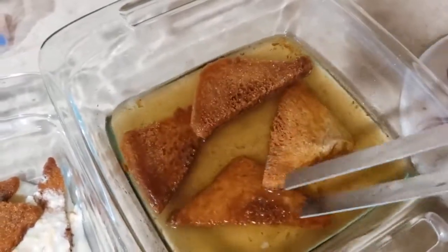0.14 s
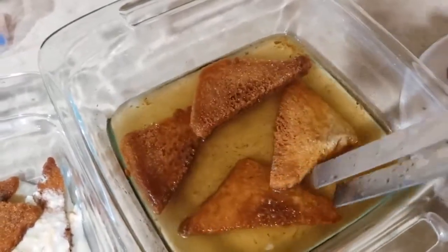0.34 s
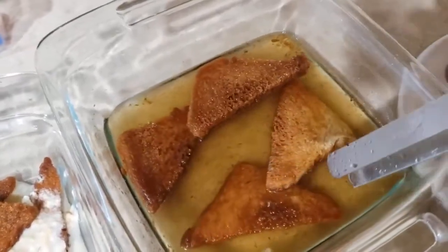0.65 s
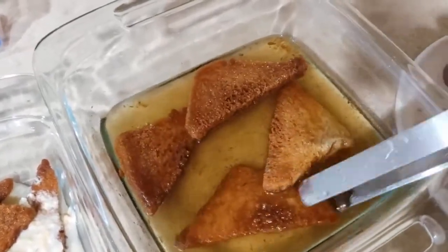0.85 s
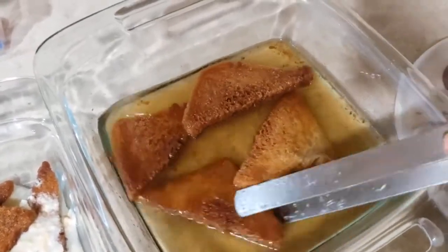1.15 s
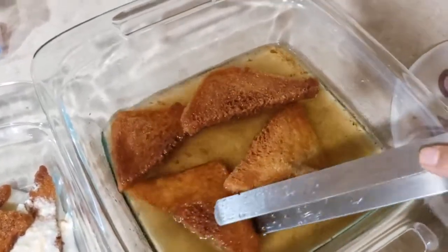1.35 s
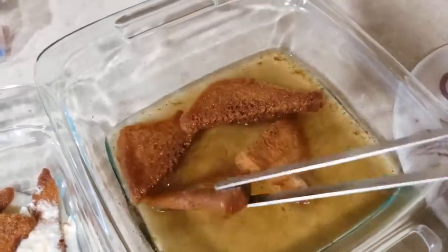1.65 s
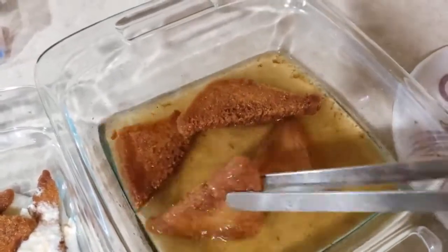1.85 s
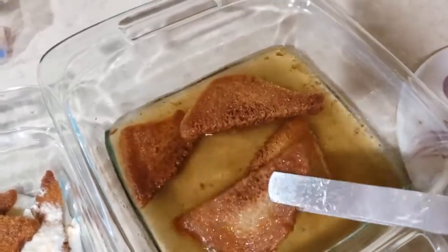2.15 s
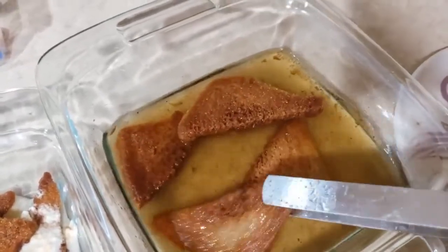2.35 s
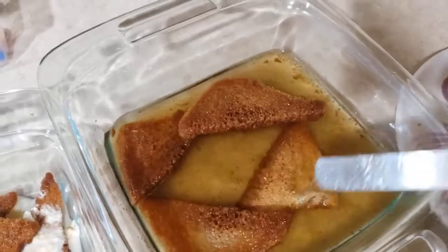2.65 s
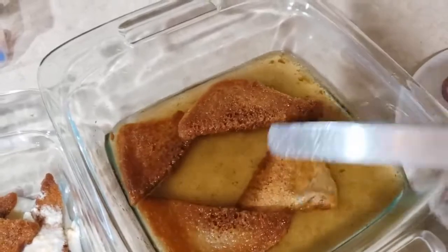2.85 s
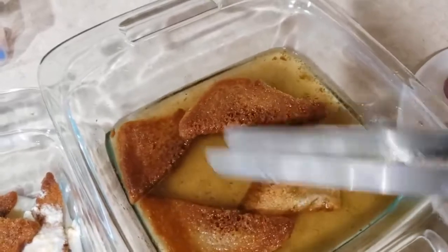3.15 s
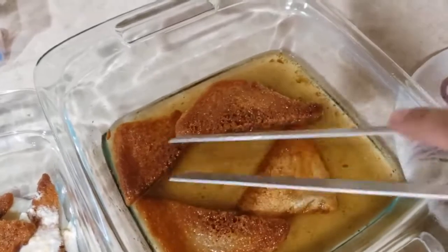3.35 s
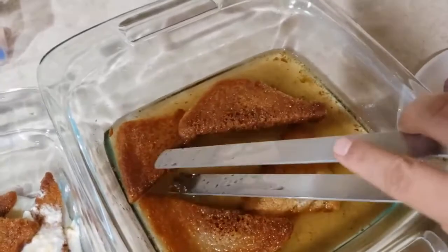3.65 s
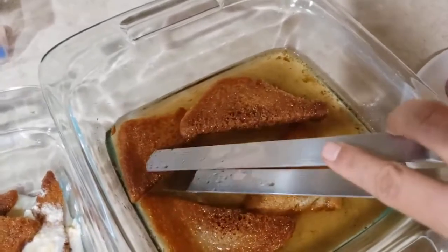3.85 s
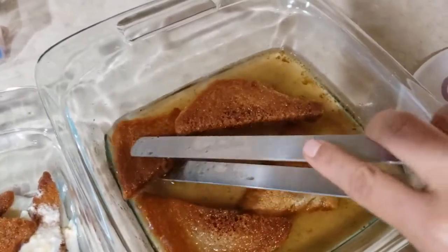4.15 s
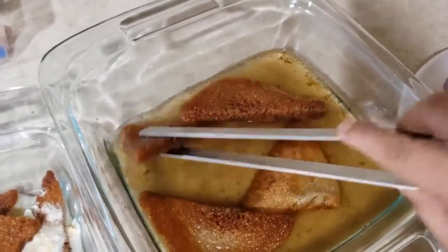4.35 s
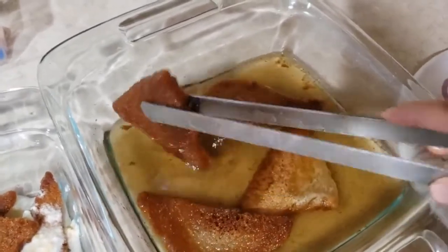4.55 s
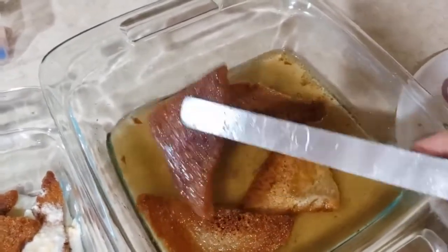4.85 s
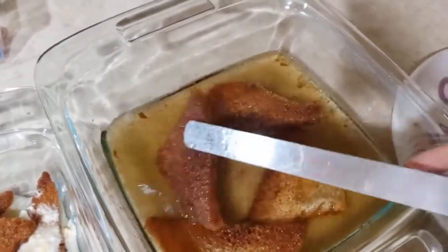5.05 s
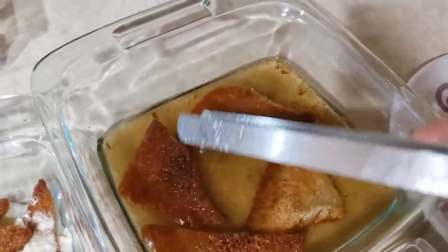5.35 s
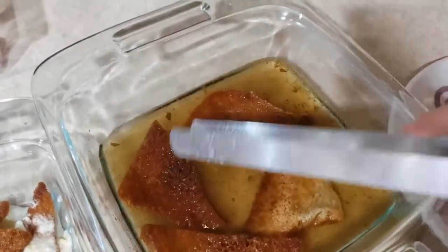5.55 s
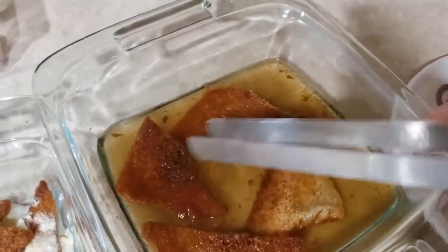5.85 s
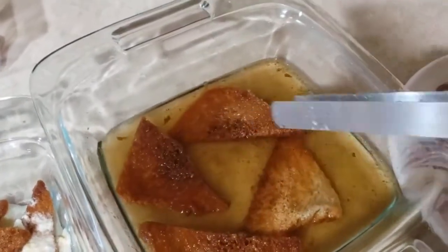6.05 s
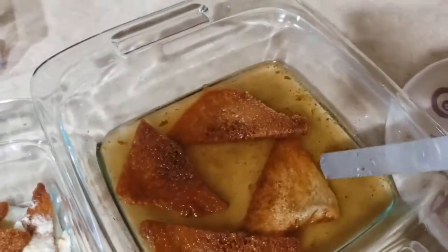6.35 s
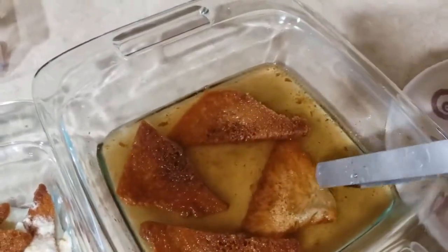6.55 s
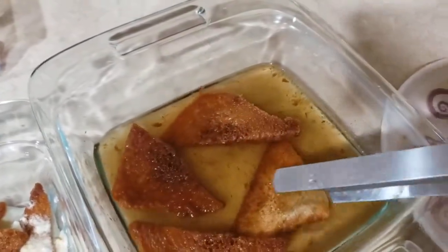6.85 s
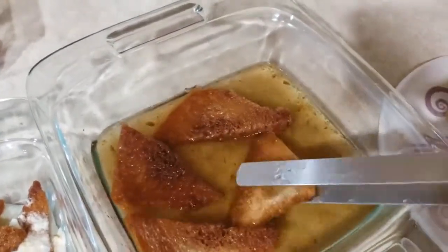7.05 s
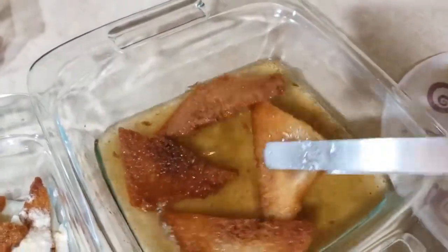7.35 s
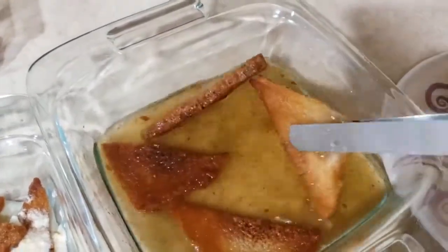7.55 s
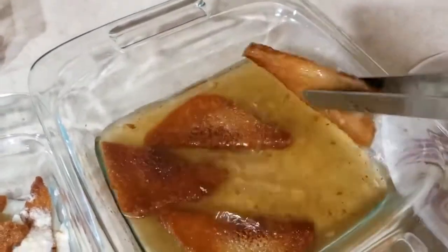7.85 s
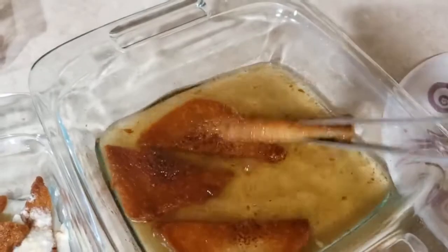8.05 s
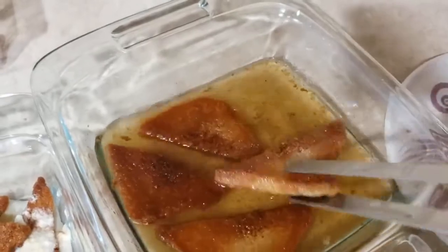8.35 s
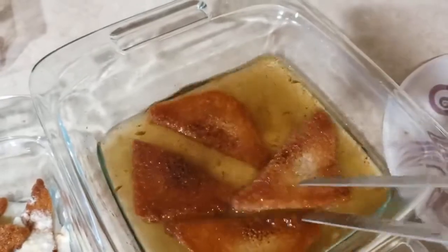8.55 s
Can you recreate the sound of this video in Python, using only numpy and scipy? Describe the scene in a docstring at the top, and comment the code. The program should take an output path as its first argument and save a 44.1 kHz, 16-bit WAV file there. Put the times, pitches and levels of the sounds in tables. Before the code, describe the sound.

Close up in a small, slightly reverberant kitchen, a low fan hums steadily. Metal tongs click together and strike a glass dish in scattered bright clinks, with quiet gaps between. In between, syrupy bread crackles faintly, peels with small wet smacks, and drops with soft gulping thuds. Muffled glass nudges follow, ending on a crisp clink.

```python
"""Tongs turning syrup-soaked bread

Steel tongs turn slices of fried bread in a glass dish of syrup, close by in a small kitchen.
Tong clinks and dish knocks are struck decaying modes plus a short noise clash.
Wet smacks, dull thuds, crackle and slosh: noise bursts and random ringing grains; syrup films snap.
A fan hums underneath (wavering sines over shaped noise), with faint hiss and a diffuse room tail."""
import sys
import numpy as np
from scipy import signal
from scipy.fft import rfft, irfft, next_fast_len
from scipy.io import wavfile
from scipy.ndimage import uniform_filter1d

SR = 44100
rng = np.random.default_rng(int(sys.argv[2]) if len(sys.argv) > 2 else 0)


def int16_out(signal):
    """Quantize to a 16-bit WAV file."""
    q = np.round(np.clip(np.atleast_2d(signal).T, -1, 1) * 32767)
    wavfile.write(sys.argv[1], SR, q.astype(np.int16))


N = 383209
CUTOFF_HZ = 15850
RING_SAMPLES = 24576
TIME = np.arange(N) / SR
AGE = np.arange(RING_SAMPLES) / SR

# glass dish modes: f/Hz, t60/s, left-right/dB, relative level/dB struck at place 0, 1, 2, 3
GLASS = [(1378, .21, -7, -8, 1.5, 3, -.5), (1520, .14, 0, -17, -9, -1, -1),
         (1892, .12, 0, -9, -13, -7, -10), (2255, .13, 0, -14, -9, -13, -7),
         (2397, .22, 0, -5, -3, -10, -11), (2652, .17, 1, -12, -3, -8, -20),
         (3064, .3, 0, -15, -10, -16, -1), (3612, .15, 5, 11, 3, -3, -10), (3985, .14, 0, -9, -11, -11, -9),
         (4170, .22, 0, -10, -12, -4, -4), (4201, .27, 4, -13, -13, -7, 3),
         (4474, .18, 0, -7, -20, -22, -22), (4780, .17, 0, -6, -7, -20, -25),
         (5100, .13, 2, -4, 1, -15, -13), (5286, .2, 2, -10, -7, -11, -9), (5675, .16, 2, -8, -8, -25, -5),
         (6170, .16, 3, -9, -6, -4, -5), (6990, .15, 0, -15, -5, -10, -20), (7300, .15, 3, 0, -8, 1, -6),
         (7625, .15, 3, -5, -5, 0, -6), (7800, .2, 2, -1, -1, -9, -12), (8300, .15, 0, -8, -10, -13, -4)]
# tong arm modes: f/Hz, t60/s, relative level/dB held loosely, held tightly
STEEL = [(6090, .25, -23, -11), (7020, .17, -15, -11), (7370, .17, -11, -20), (7560, .23, -14, -30),
         (8594, .11, -4, -13), (10280, .15, -11, -13), (11460, .11, -8, 3), (11594, .11, -4, -10),
         (12260, .12, -7, -11), (12662, .12, -2.5, -11), (13070, .13, -11, -13), (13150, .11, -6, -9),
         (14080, .11, -9, -6), (14647, .12, -5, -12), (14770, .1, -8, -6), (15430, .1, -11, -22)]
# wet smack spectrum: f/Hz, relative density/(dB per Hz)
SMACK = [(760, -10), (1300, -4.5), (2730, -13), (3130, -13), (5160, -10.5), (6170, -3.5), (6710, -4),
         (7140, -2), (8800, -8.5), (11400, -2.5), (15800, -2.5)]


def from_db(db):
    """Decibels to gain."""
    return 10 ** (np.asarray(db) / 20)


def rms_one(x):
    """Scale to unit power."""
    return x / np.sqrt(np.mean(x ** 2) + 1e-20)


def pan(db):
    """Left and right gains for a level difference."""
    return from_db(np.array([[db], [-db]]) / 2)


def at_hz(points, hz):
    """Interpolate a table on a log-frequency axis."""
    table_hz, table_db = np.transpose(points)
    return np.interp(np.log(hz + 1), np.log(table_hz), table_db)


def fade(t60_s):
    """Exponential decay after a blow."""
    return from_db(-60 * AGE / max(t60_s, .001))


def swell(rise_s):
    """Exponential build-up while a contact lasts."""
    return 1 - np.exp(-AGE / max(rise_s, 1e-5))


def add(out, s, sound):
    """Mix a sound in at time s."""
    start = max(round(s * SR), 0)
    out[:, start:start + sound.shape[1]] += sound[:, :N - start]


def drift(knots_per_s):
    """Slow random wander, linear between knots; rms 1."""
    knots = rng.standard_normal(2000)
    return rms_one(np.interp(TIME * knots_per_s, np.arange(len(knots)), knots))


def smooth_noise(size, width):
    """Moving average of white noise; rms 1."""
    return rms_one(uniform_filter1d(rng.standard_normal(size), size=width))


def noise(spectrum, size, tilt_db=0):
    """Stereo noise of a given colour, tilted per octave, most alike in both ears in the bass; rms 1."""
    # likeness of the ears: f/Hz, left-right correlation
    likeness = [(55, 1), (130, .7), (280, 0.94), (600, 0.29), (1500, 0.021), (6000, 0.035), (14000, 0.087)]
    padded = next_fast_len(size, True)
    hz = np.fft.rfftfreq(padded, 1 / SR)
    mid, side = rfft(rng.standard_normal((2, padded)))
    alike = np.clip(at_hz(likeness, hz), -1, 1)
    gain = from_db(at_hz(spectrum, hz) + tilt_db * np.log2(hz + 1)) * (hz < CUTOFF_HZ)
    gain = gain / (1 + (hz / (2 * spectrum[-1][0])) ** 4)  # roll-off beyond the table
    ears = np.sqrt(1 + alike) * mid + np.sqrt(1 - alike) * side * [[1], [-1]]
    return rms_one(irfft(gain * ears)[:, :size])


def mode_shapes(hz, t60_s):
    """Decaying sines, then decaying cosines, one row a mode."""
    turn = 2 * np.pi * np.outer(hz, AGE)
    decay = np.array([fade(t) for t in t60_s])
    return np.vstack([decay * np.sin(turn), decay * np.cos(turn)])


def ring(shapes, level_db, side_db, spread_rad):
    """Strike modes at random phase; each leads in one ear by spread_rad."""
    common, leader = rng.uniform(-1, 1, (2, len(level_db)))
    ears = np.array([[.5], [-.5]])
    phase = np.pi * common + spread_rad * np.sign(leader) * ears
    gain = from_db(level_db + side_db * ears)
    return np.hstack([gain * np.cos(phase), gain * np.sin(phase)]) @ shapes


def fan(waver_db, wander_hz):
    """Motor and blade tones waver over the rush of air; standing waves favour one ear or the other."""
    # motor and blade tones: f/Hz, level/dB, left-right/dB
    hum = [(120.7, -58, 6), (176.3, -62.5, 18.5), (240.3, -59, 8), (292.9, -47, -1.8), (476, -66, 6),
           (644.8, -65, 1)]
    # air moved by the fan: f/Hz, relative density/(dB per Hz)
    air = [(20, -46.5), (34, -22), (48, 2), (62, -5.5), (95, -16), (150, -10.5), (210, -11), (280, -9.5),
           (350, -12), (450, -15.5), (550, -20.5), (750, -22.5), (1050, -36), (2500, -49.5)]
    air_db = -51.5
    out = from_db(air_db) * noise(air, N) * pan(0.61)
    ear_phase = np.array([[.25], [-.25]])
    for hz, db, side_db in hum:
        phase = 2 * np.pi * np.cumsum(hz + wander_hz * drift(7)) / SR
        level = from_db(db + waver_db * drift(22))
        out += level * np.sin(phase + ear_phase) * pan(side_db)
    return out


def clash(tilt_db, chatter_db, ripple_db):
    """The tip chatters and sets off a thicket of short-lived modes, new at each blow."""
    # dense upper modes of steel and glass together: f/Hz, relative density/(dB per Hz)
    thicket = [(300, -4.5), (750, -5.5), (1250, 2), (1720, -9), (2000, -3), (2700, 3), (3350, -7.5),
               (3900, -0.5), (4600, -4.5), (5300, -1.5), (7500, 0.5), (9150, -10), (10000, -4.5),
               (15600, -9.5)]
    chatter = from_db(chatter_db * fade(.4) * smooth_noise(RING_SAMPLES, 40))
    spectrum = rfft(noise(thicket, RING_SAMPLES, tilt_db))
    peaks = from_db(ripple_db * smooth_noise(spectrum.shape[1], 70))
    decay = fade(0.081) + from_db(-18.5) * fade(0.17)
    return rms_one(irfft(spectrum * peaks)) * chatter * swell(.0014) * decay


def steel(shapes, grip, chance_db):
    """The squeeze of the hand picks which modes of the arms ring."""
    _, _, loose_db, tight_db = np.transpose(STEEL)
    level_db = loose_db + (tight_db - loose_db) * np.clip(grip, 0, 1)
    level_db = level_db + chance_db * rng.standard_normal(len(STEEL))
    return ring(shapes, level_db, side_db=-3.0, spread_rad=0.98) * swell(0.0015)


def glass(shapes, cut_hz, place, chance_db):
    """The place of the blow picks the modes; a contact cushioned by bread rings only the lowest."""
    hz, _, side_db = np.transpose(GLASS)[:3]
    level_db = np.array([np.interp(place, np.arange(4), mode[3:]) for mode in GLASS])
    cushion_db = -10 * np.log10(1 + (hz / cut_hz) ** 6)
    level_db = level_db + cushion_db + chance_db * rng.standard_normal(len(hz))
    # the tip stays against the glass: it damps the first ring and makes it buzz
    damping = from_db(-3) + from_db(-9) * fade(0.55)
    buzz = from_db(2 * fade(0.92) * smooth_noise(RING_SAMPLES, 150))
    return ring(shapes, level_db, side_db, spread_rad=1.7) * swell(0.0026) * damping * buzz


def tongs():
    """Every contact sounds the steel, the glass and the table under it, in shares set by its kind."""
    # table modes under the dish: f/Hz, relative level/dB, t60/s
    table_modes = [(63.8, -9, 0.81), (88.8, -1, 0.2), (137.6, -5.5, 0.18), (165.6, -4.5, 0.098),
                   (205, -2.5, 0.24), (378, -1, 0.024), (419, 0, 0.1), (462.4, -2, 0.24)]
    # arms click together: t/s, clash/dB, clash tilt/(dB per octave), steel ring/dB, grip 0 loose-1 tight
    clicks = [(.005, -38, 18.5, -46.5, 0.03), (0.7836, -33, 5, -25.5, .15), (1.384, -44, 14, -48.5, 0.8),
              (2.054, -42.5, 16, -41.5, 0.44), (2.1, -38, 20, -61, 0.63), (3.726, -25.5, 5, -35, 0.6),
              (4.093, -46.5, 9, -47, 1), (4.107, -36, 13, -44.5, 1), (4.201, -39.5, 13, -59, .6),
              (5.0437, -34.5, 11, -60.5, 0.1), (7.692, -40.5, 4, -62, .5)]
    # tips nudge the dish through bread and syrup: t/s, glass ring/dB, tick/dB, knock/dB
    touches = [(.332, -81, -62, -78.5), (0.98, -62, -55.5, -50), (1.121, -100, -55.5, -60),
               (2.353, -48.5, -58, -48.5), (2.434, -53.5, -55.5, -64), (2.504, -60.5, -63, -64.5),
               (3.008, -67, -61, -71), (6.909, -50, -65.5, -42.5), (7.095, -53, -45, -36),
               (7.921, -47.5, -53, -43.5), (8.016, -40, -49, -53.5)]
    # tongs hit bare glass, one arm after the other: t/s, clash/dB, clash tilt/(dB per octave),
    # steel ring/dB, grip 0-1, glass ring/dB, place 0-3 (clamped), second arm lag/s, left-right/dB
    strikes = [(0.7865, -23, 6, -27, 0.13, -34, 0.5, 0.0052, 0),
               (2.114, -28, -0.5, -45, 0.22, -37.5, 2.5, .03, 1),
               (6.414, -24.5, 7, -38.5, 0.36, -34, 1.5, .015, -0.5),
               (6.494, -32, 3, -61, .5, -56, 2, 0.0048, 2),
               (6.575, -35, 0, -70, .5, -51.5, -2.5, 0.0068, 3.5),
               (8.4512, -27, 4, -35, 0.61, -39, 3, .007, 2.5)]
    # what reaches table and dish through the bread, relative to the clash
    click_knock_db, click_glass_db = -17, -32
    touch_cut_hz, touch_place = 1250, 2.15  # cushioned contact
    tick_tilt_db_per_oct, tick_ring_db = 2, -15  # arm ring relative to the tick
    bare_cut_hz, strike_knock_db = 9800, -11.5  # hard contact; knock relative to the clash
    # the second arm lands softer and duller
    second_arm_db, second_arm_tilt_db_per_oct = -5, -3

    out = np.zeros((2, N))
    table_hz, table_db, table_t60_s = np.transpose(table_modes)
    dish = mode_shapes(*np.transpose(GLASS)[:2])
    arms = mode_shapes(*np.transpose(STEEL)[:2])
    table = mode_shapes(table_hz, table_t60_s)

    def metal(clash_db, tilt_db, steel_db, grip):
        """Clash of the tip and ring of the arms."""
        tip = from_db(clash_db) * clash(tilt_db, chatter_db=-1.5, ripple_db=4.0)
        return tip + from_db(steel_db) * steel(arms, grip, chance_db=4.5)

    def body(glass_db, cut_hz, place, knock_db):
        """Ring of the dish and its knock on the table."""
        knock = swell(0.0044) * ring(table, table_db, side_db=-0.5, spread_rad=0.47)
        return from_db(glass_db) * glass(dish, cut_hz, place, chance_db=-4.5) + from_db(knock_db) * knock

    for s, clash_db, tilt_db, steel_db, grip in clicks:
        carried = body(clash_db + click_glass_db, cut_hz=4300, place=1.9,
                       knock_db=clash_db + click_knock_db)
        add(out, s, metal(clash_db, tilt_db, steel_db, grip) * pan(-0.16) + carried)
    for s, glass_db, tick_db, knock_db in touches:
        tick = metal(tick_db, tick_tilt_db_per_oct, tick_db + tick_ring_db, grip=0)
        add(out, s, tick * pan(2.8) + body(glass_db, touch_cut_hz, touch_place, knock_db))
    for s, clash_db, tilt_db, steel_db, grip, glass_db, place, lag_s, side_db in strikes:
        both_arms = [(0, 0, 0), (lag_s, second_arm_db, second_arm_tilt_db_per_oct)]
        for delay_s, arm_db, arm_tilt_db in both_arms:
            blow = metal(clash_db, tilt_db + arm_tilt_db, steel_db, grip) * pan(side_db)
            struck = body(glass_db, bare_cut_hz, place, clash_db + strike_knock_db)
            add(out, s + delay_s, from_db(arm_db) * (blow + struck))
    return out


def pops():
    """A film of syrup snaps: a noise burst dying within milliseconds."""
    # film snaps: t/s, level/dB
    snaps = [(.4995, -48), (1.8712, -22), (2.8813, -53), (7.0364, -47), (7.444, -45)]
    out = np.zeros((2, N))
    for s, db in snaps:
        add(out, s, from_db(db) * noise(SMACK, RING_SAMPLES) * fade(0.0032))
    return out


def grains(low_hz, high_hz, per_s, cycles, spread_db, count):
    """Bubbles and films burst at random, each ringing at one of `count` pitches, t60 = cycles / f; rms 1."""
    out = np.zeros((2, N))
    for hz in np.geomspace(low_hz, high_hz, count):
        born = np.flatnonzero(rng.random(N) < per_s / count / SR)
        chance = rng.random((len(born), 3))
        sizes = from_db(spread_db * np.minimum(-np.log(1 - chance[:, 0]), 3.5))
        impulses = np.zeros((2, N))
        impulses[:, born] = sizes * (2 * chance[:, 1:].T - 1)
        impulses = impulses + 1e-12 * (TIME % .01)  # inaudible floor
        radius = from_db(-60 * hz / (cycles * SR))
        angle = 2 * np.pi * hz / SR
        resonator = [1, -2 * radius * np.cos(angle), radius * radius]
        out += np.sqrt(hz) * rms_one(signal.lfilter([1, 0, -1], resonator, impulses))
    return rms_one(out)


def coloured(x, spectrum):
    """Filter a steady texture by a spectrum; rms 1."""
    size = next_fast_len(N, True)
    gain = from_db(at_hz(spectrum, np.fft.rfftfreq(size, 1 / SR)))
    return rms_one(irfft(rfft(x, size) * gain, size)[:, :N])


def against_dish(x, t60_s):
    """Scraping under syrup wakes the modes of the glass, heavily damped; rms 1."""
    hz = np.transpose(GLASS)[0]
    shapes = mode_shapes(hz, np.full(len(hz), t60_s))
    response = ring(shapes, np.zeros(len(hz)), side_db=3, spread_rad=1.4)
    return rms_one(signal.fftconvolve(x, response, axes=1)[:, :N])


def push(start_s, length_s):
    """Speed of a slice: it picks up, holds, stops, and leaves the syrup to settle."""
    attack_s, release_s = 0.0041, 0.0076  # time constants of taking hold and letting go
    settle_db, settle_s = -27, 0.28  # syrup runs back: relative level, time constant
    attack = 1 - np.exp(-np.maximum(TIME - start_s, 0) / attack_s)
    after = np.maximum(TIME - start_s - length_s, 0)
    settling = from_db(settle_db) * np.exp(-after / settle_s)
    return attack * np.maximum(np.exp(-after / release_s), settling)


def bread():
    """Moving bread crackles and sloshes; peels, plops and dull thuds are noise bursts in three bands."""
    # dull thuds and plops: slices dropping into the syrup, and at .804 the dish rocking:
    # t/s, splash/dB, gulp/dB, thump/dB
    plops = [(.804, -38, -34.5, -46.5), (4.1335, -43, -45.5, -35), (4.261, -41.5, -40.5, -46),
             (4.462, -52, -45, -53.5), (4.86, -68, -54, -49), (5.189, -53, -51, -50),
             (5.615, -48.5, -39, -45), (5.634, -52, -53, -43), (6.988, -61, -45, -45),
             (7.746, -60, -45.5, -60.5), (8.102, -53, -42, -37.5)]
    # bread pushed through the syrup: t/s, length/s, crackle/dB, slosh/dB
    pushes = [(.99, 0.38, -71, -66.5), (1.373, 0.22, -58, -59), (1.648, 0.36, -68.5, -73),
              (2.273, 0.29, -70, -66.5), (4.072, 0.23, -56.5, -53.5), (4.413, 0.11, -58, -58),
              (4.85, 0.37, -62.5, -65), (6.682, 0.17, -66, -69), (6.979, 0.494, -59.5, -63),
              (7.678, 0.025, -46, -49.5), (8.028, 0.14, -64, -64), (8.34, 0.072, -65.5, -71)]
    # wet bread peels off glass or steel: t/s, smack/dB
    peels = [(1.452, -44), (1.492, -36), (1.537, -40.5), (1.607, -47), (1.871, -33), (4.509, -43.5),
             (4.886, -53), (7.175, -42.5), (7.666, -48)]
    # gulps and bubbles: f/Hz, relative density/(dB per Hz)
    gulp_spectrum = [(100, -49), (300, -19.5), (520, -2.5), (640, -3.5), (850, 0), (1000, -11), (1250, -6),
                     (1700, -23.5), (2600, -27.5)]
    # low thump: f/Hz, relative density/(dB per Hz)
    thump_spectrum = [(30, -20), (60, 12.5), (110, -11.5), (200, -12.5), (400, -14), (700, -21)]
    peel_gulp_db, peel_thump_db = -10.5, -24  # relative to the smack

    crackle, slosh, burst = np.zeros((3, 1, N))
    lows = np.zeros((2, N))
    for s, length_s, crackle_db, slosh_db in pushes:
        speed = push(s, length_s)
        crackle += from_db(crackle_db) * speed
        slosh += from_db(slosh_db) * speed
    full_peels = [(s, db, db + peel_gulp_db, db + peel_thump_db) for s, db in peels]
    for s, smack_db, gulp_db, thump_db in full_peels + list(plops):
        add(burst, s, from_db(smack_db) * (swell(0.0037) * fade(0.087))[None])
        # the weaker the smack beside the gulp, the deeper the gulp
        gulp = noise(gulp_spectrum, RING_SAMPLES, tilt_db=0.28 * (smack_db - gulp_db))
        thump = noise(thump_spectrum, RING_SAMPLES)
        add(lows, s, from_db(gulp_db) * gulp * swell(0.0015) * fade(0.11))
        add(lows, s, from_db(thump_db) * thump * swell(0.0009) * fade(0.36))

    fine = grains(1547, 15000, per_s=3200, cycles=24, spread_db=1.5, count=22)
    fine = coloured(fine, SMACK) * from_db(1.9 * drift(56))  # the crumb gives way in clumps
    scrape = fine + from_db(-6) * against_dish(fine, t60_s=0.06)
    bubbles = grains(430, 2170, per_s=1100, cycles=8.4, spread_db=1.5, count=9)
    bubbles = coloured(bubbles, gulp_spectrum)
    spatter = from_db(-1.0) * noise(SMACK, N) + from_db(-2.0) * scrape
    return (crackle * scrape + burst * spatter) * pan(2.3) + slosh * bubbles + lows


def kitchen(x, gap_s):
    """Diffuse reflections from the near walls: decaying noise, unrelated in each ear."""
    t60_s = 0.34
    onset = np.clip(AGE / gap_s - .5, 0, 1)
    tail = rng.standard_normal((2, RING_SAMPLES)) * fade(t60_s) * onset
    tail /= np.sqrt(np.sum(tail ** 2, axis=1, keepdims=True))
    return signal.fftconvolve(x, tail, axes=1)[:, :N]


def scene():
    """Tongs and bread in the room, over the fan and a faint hiss."""
    # microphone hiss: f/Hz, relative density/(dB per Hz)
    hiss = [(760, -40), (1300, -2), (1520, -9), (2020, -22.5), (2790, -4), (3190, -18), (9670, -14),
            (14100, 0.5), (15800, -5.5)]
    hiss_db = -74
    background = fan(waver_db=0.57, wander_hz=1.5) + from_db(hiss_db) * noise(hiss, N)
    hard = tongs()
    wet = pops() + bread()
    room = kitchen(from_db(-11) * hard + from_db(-10.5) * wet, gap_s=0.007)
    return background + hard + wet + room


def record(dry):
    """The microphone drops the deepest bass, and the top is cut steeply."""
    bass_cut = signal.butter(6, 41, "high", fs=SR, output="sos")
    top_cut = signal.ellip(12, .1, 80, CUTOFF_HZ, fs=SR, output="sos")
    return signal.sosfilt(top_cut, signal.sosfilt(bass_cut, dry))


dry = scene()
out = record(dry)
int16_out(out)
```